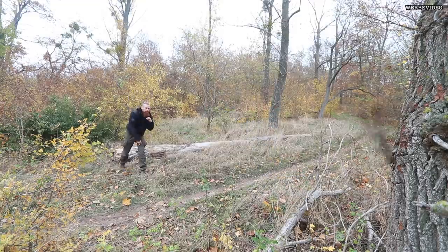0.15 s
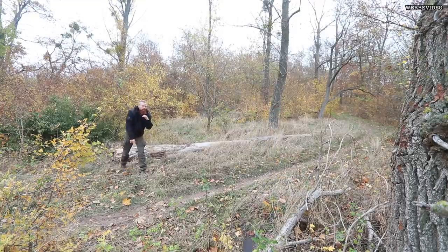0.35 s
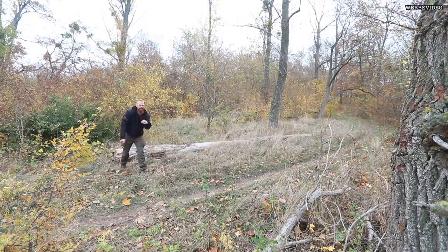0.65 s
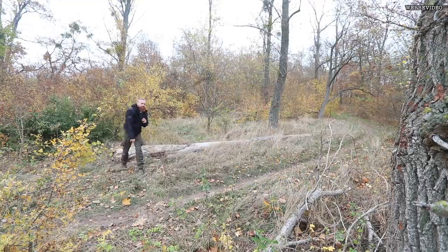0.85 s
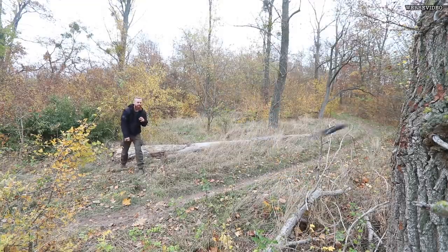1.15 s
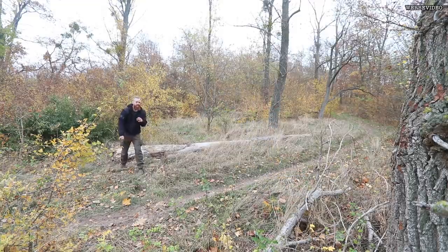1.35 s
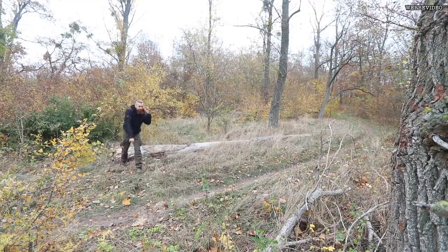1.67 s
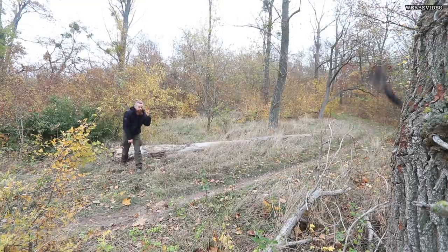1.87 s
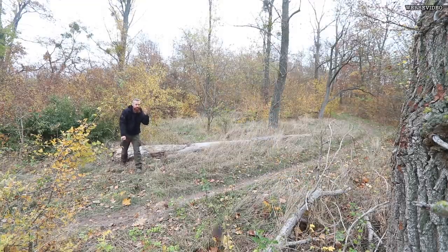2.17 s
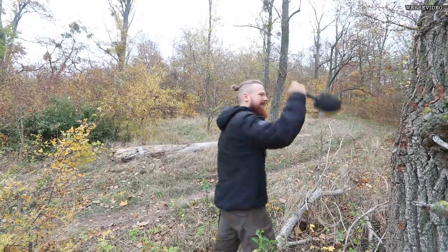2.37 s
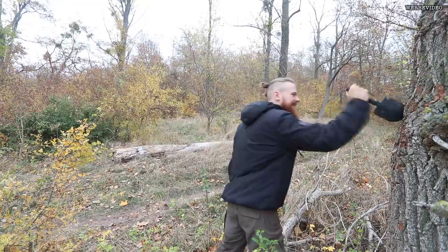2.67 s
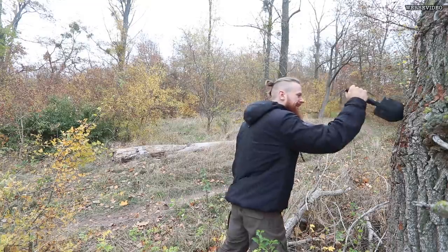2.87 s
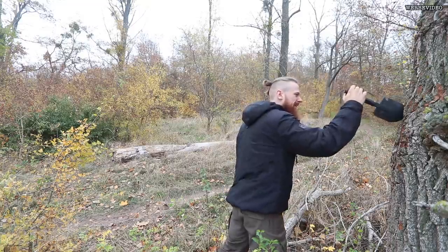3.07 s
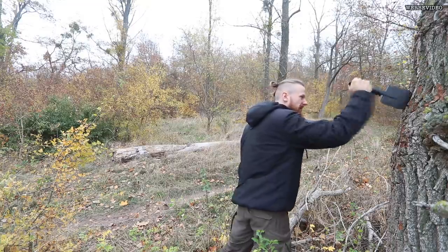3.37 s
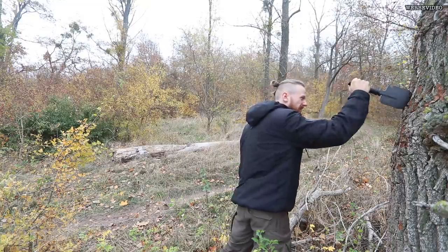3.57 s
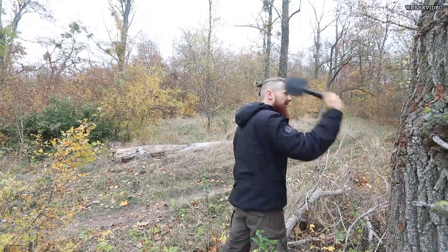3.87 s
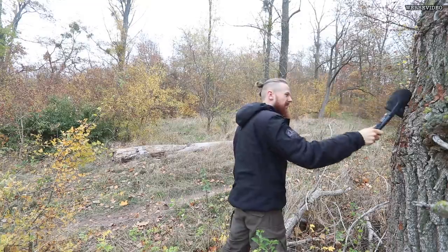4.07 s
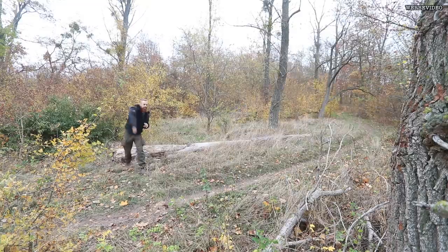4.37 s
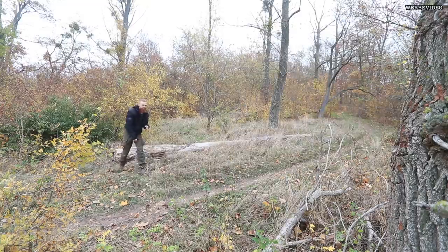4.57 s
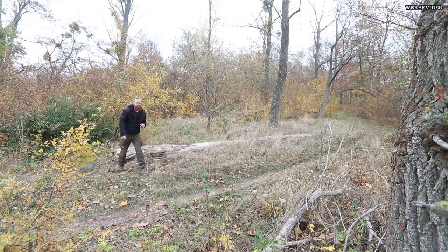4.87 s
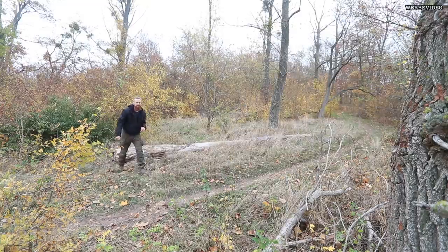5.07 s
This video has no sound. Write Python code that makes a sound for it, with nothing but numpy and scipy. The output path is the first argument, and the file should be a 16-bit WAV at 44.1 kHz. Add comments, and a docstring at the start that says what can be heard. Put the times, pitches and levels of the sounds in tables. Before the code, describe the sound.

A spinning steel shovel swishes in and cracks hard into a nearby tree trunk several times, with hand chops between, in a quiet autumn wood.

```python
"""An autumn wood: a steel folding shovel is thrown and chopped at a tree trunk close to the microphone. In
flight it swishes and whistles (wavering tones and filtered noise); each blow is a shaped noise crack, a damped
low thud and a ring of beating blade modes. Throws chatter at the hinge; the loose shovel then drops into dry
leaves and dead branches, built from noise grains and snaps. Decaying noise echoes answer each blow until its
attempt is cut off; a soft hush lies beneath, and the loudest peaks are flattened."""
import sys
import numpy as np
from scipy import signal
from scipy.fft import rfft, irfft
from scipy.io import wavfile
from scipy.ndimage import uniform_filter1d

SR = 44100
rng = np.random.default_rng(int(sys.argv[2]) if len(sys.argv) > 2 else 0)


def waveform_to_disk(signal):
    """Save audio, clipped to [-1, 1], as 16-bit WAV at the path in sys.argv[1]."""
    frames = np.transpose(np.atleast_2d(signal))
    scaled = np.clip(frames, -1, 1) * 32767
    samples = np.round(scaled).astype(np.int16)
    wavfile.write(sys.argv[1], SR, samples)


N = 230598  # length in samples


def amp(db):
    """Decibels to gain."""
    return 10 ** (np.asarray(db) / 20)


def unit(x):
    """Scales to rms 1."""
    return x / np.sqrt(np.mean(x ** 2) + 1e-20)


def read(points, hz, axis=1):
    """Reads one column of a table along log frequency."""
    table = np.array(points, float)
    return np.interp(np.log(hz + 1), np.log(table[:, 0] + 1), table[:, axis])


def add(mix, start_s, sound):
    """Mixes a sound in at a start time."""
    part = mix[:, max(round(start_s * SR), 0):][:, :sound.shape[-1]]
    part += sound[..., :part.shape[1]]


def bump(hz, centre_hz, octaves):
    """A bell of height 1 around a frequency."""
    return np.exp(-.5 * (np.log2((hz + 1) / centre_hz) / octaves) ** 2)


# left-right likeness of close sounds before any widening: pitch_hz, likeness (0 to 1)
LIKENESS = [(40, 0.32), (150, 0.59), (400, 0.95), (2000, 1), (5000, .92), (14000, 0.84)]


def coloured(white, colour_db, spread=1):
    """Two noises become a left-right pair with a spectrum, at rms 1; spread widens it."""
    hz = np.fft.rfftfreq(white.shape[1], 1 / SR)
    mid, side = rfft(white) * amp(colour_db(hz))
    same = np.clip(read(LIKENESS, hz), 0, 1)
    side = side * spread * np.sqrt((1 - same) / (1 + same))
    return unit(irfft(np.array([mid + side, mid - side]), white.shape[1]))


# spectrum of the distant hush of the wood: pitch_hz, relative level_db (per Hz)
AIR_COLOUR = [(20, -23), (45, -10.5), (80, -4.5), (150, -9), (300, -6.5), (550, -2), (950, -4), (1500, -11),
              (2500, -17), (8000, -22), (16000, -32)]
AIR_DB = -59.5


def hush():
    """Far-off air in the trees: steady, wide filtered noise."""
    white = rng.standard_normal((2, N))
    return amp(AIR_DB) * coloured(white, lambda hz: read(AIR_COLOUR, hz), spread=3.9)


# dry leaves crushed by the falling shovel or stirred by feet: start_s, hold_s, level_db, release_t60_s
RUSTLES = [(0.01, 0.12, -72, .1), (0.537, 0.046, -36.5, 0.23), (0.665, 0.34, -58.5, .25),
           (1.59, 0.22, -61, 0.31), (2.285, 0.016, -54, 0.13), (2.337, .024, -33.5, 0.087),
           (2.407, 0.1, -58, 1), (4.428, 0.18, -58, 0.31), (5.042, .02, -36, 0.55)]
SWELL_SHARE, STIR_DB = 0.26, -75.5  # swell width as a share of the hold; the leaves are never quite still


def rustling():
    """How hard the leaves are stirred: each rustle swells, holds and dies away."""
    clock, power = np.arange(N) / SR, amp(STIR_DB) ** 2
    for start_s, hold_s, level_db, t60_s in RUSTLES:
        before_s = np.minimum(clock - start_s, 0)
        after_s = np.maximum(clock - start_s - hold_s, 0)
        swell = np.exp(-.5 * (before_s / (SWELL_SHARE * hold_s)) ** 2)
        power = power + (swell * amp(level_db - 60 * after_s / t60_s)) ** 2
    return np.sqrt(power)


# spectrum of crackling leaves: pitch_hz, relative level_db (per Hz)
LEAF_COLOUR = [(25, -27.5), (100, -9), (400, -6.5), (1000, 0), (2200, 1.5), (4500, -3.5), (8000, -1),
               (12000, -6.5), (16000, -11.5)]
# twigs snapping: start_s, level_db, pitch_hz
TWIGS = [(0.524, -40, 7000), (0.725, -43.5, 4260), (1.404, -39, 3305), (1.4317, -37.5, 6050),
         (2.331, -36, 4000)]


def litter(grains_per_s=5000, twig_t60_s=0.015):
    """Dry leaves crackle in sparse random grains; now and then a twig snaps in a short noise burst."""
    grains = (rng.random(N) < grains_per_s / SR) * rng.standard_normal((2, N))
    out = rustling() * coloured(grains, lambda hz: read(LEAF_COLOUR, hz), spread=3.7)
    t = np.arange(2 ** 11) / SR
    for start_s, level_db, twig_hz in TWIGS:
        snap = coloured(rng.standard_normal((2, len(t))), lambda hz: 16 * bump(hz, twig_hz, 0.5))
        add(out, start_s, snap * amp(level_db - 60 * t / twig_t60_s))
    return out


def breathy(hz, waver_hz, waver_per_s=120):
    """An unsteady air tone that wavers around a pitch curve."""
    low_pass = signal.butter(2, waver_per_s, fs=SR)
    waver = unit(signal.lfilter(*low_pass, rng.standard_normal(len(hz))))
    return unit(np.sin(2 * np.pi * np.cumsum(hz + waver_hz * waver) / SR))


# spectrum of the blade's swish through air: pitch_hz, relative level_db (per Hz)
SWISH_COLOUR = [(25, -29), (80, -14.5), (200, -3.5), (450, 1.5), (850, -1), (1400, -5), (2000, -8),
                (3500, -12), (8000, -19), (16000, -32)]
# the flight that ends in each throw's hit, levels as if at the microphone:
# last_whistle_s, swish_db (before its pulsing), whistle_db (before a further fade with distance)
FLIGHTS = [(.15, -46, -40), (0.977, -49.5, -53), (1.836, -48.5, -40.5), (4.613, -47, -46.5)]
FLIGHT_S, SPEED_M_PER_S, TRUNK_M = 0.25, 12, 1.8  # longest time in the air, speed, microphone to trunk
TURN_S = .141  # one turn of the shovel
WHISTLE_HZ, EDGE_TONE_HZ, DOPPLER_SHARE = 1890, 900, 0.11  # blade tones; the edge tone sags as it nears


def whirl(spin_db=3, swish_lead_s=0.013, whistle_s=.006, edge_db=-4, edge_swing_db=7, edge_lag_s=.035):
    """The spinning shovel nears: each end swishes in turn, the blade whistles once a turn, its edge sings."""
    out = np.zeros((2, N))
    for (hit_s, *_), (last_whistle_s, swish_db, whistle_db) in zip(THROWS, FLIGHTS):
        left_s = np.arange(min(hit_s, FLIGHT_S), 0, -1 / SR)  # time until the hit
        near = TRUNK_M / (TRUNK_M + SPEED_M_PER_S * left_s)
        turn = 2 * np.pi * (hit_s - left_s - last_whistle_s) / TURN_S

        white = rng.standard_normal((2, 2 ** 15))
        swish = coloured(white, lambda hz: read(SWISH_COLOUR, hz), spread=3)[:, :len(left_s)]
        swish_turn = turn + 2 * np.pi * swish_lead_s / TURN_S
        swish = swish * amp(swish_db + spin_db * np.cos(2 * swish_turn))  # two ends, two swishes a turn

        edge = breathy(EDGE_TONE_HZ * (1 - DOPPLER_SHARE * near), waver_hz=35)
        edge_turn = turn - 2 * np.pi * edge_lag_s / TURN_S
        edge = edge * amp(swish_db + edge_db + edge_swing_db * np.cos(edge_turn))

        edge_on = np.exp((np.cos(turn) - 1) * (TURN_S / (2 * np.pi * whistle_s)) ** 2)
        whistle = amp(whistle_db) * edge_on * breathy(np.full(len(left_s), WHISTLE_HZ), waver_hz=50)
        # the tones fade with distance faster than the swish
        add(out, hit_s - left_s[0], near * (swish + near * (edge + whistle)))
    return out


# the steel blade, each mode a close pair that beats: pitch_hz, level_db (before tilt),
# t60_s (before the contact's share), beat_hz, lift_db (of the crack while pressed on wood)
BLADE = [(795, -23.5, 0.083, 11, 1.5), (1733, -6, 0.18, 19, 4), (2124, -24.5, .08, 56, 4),
         (2310, -19, 0.049, 15, 3), (2906, -23, 0.094, 25, 1), (3531, -21.5, 0.17, 16, -0.5),
         (4000, -21, .12, 14, 2), (4475, -19, 0.11, 34, 3.5), (5020, -23, .07, 38, 3.5),
         (5410, -2, 0.1, 69, 3.5), (6510, -20.5, 0.088, 35, 0), (7080, -19.5, 0.087, 61, 3.5),
         (7674, -10.5, 0.051, 34, 4), (8300, -19, 0.073, 55, 5.5), (9040, -19, .08, 32, 4)]


def pressed_blade(hz, width_hz=55, width_share=0.0028):
    """Pressed against wood, the blade's modes widen into broad resonances (dB)."""
    centre_hz, *_, lift_db = np.transpose(BLADE)[:, :, None]
    width = width_hz + width_share * centre_hz
    return (lift_db * np.exp(-.5 * ((hz - centre_hz) / width) ** 2)).sum(0)


def ring(t, tilt_db, share, twin_db=-2, linger_db=-14, linger_tilt_db=-7, linger=2.8, lag_s=.000012):
    """The blade rings from rest; wide swings lose energy fast in the hinge, small ones linger."""
    hz, level_db, t60_s, beat_hz, _ = np.transpose(BLADE)[:, :, None]
    fall_db = 60 * t / (t60_s * share)
    lingering = amp(linger_db + linger_tilt_db * np.log2(hz / hz[1]) - fall_db / linger)
    fade = amp(level_db + tilt_db * np.log2(hz / 4500)) * (amp(-fall_db) + lingering)
    twin = 1 + amp(twin_db) * np.exp(2j * np.pi * beat_hz * t)
    pair = np.exp(2j * np.pi * (hz - beat_hz / 2) * t) * twin
    # left and right hear it slightly out of step
    ports = np.exp(2j * np.pi * hz.T * np.array([[-lag_s], [lag_s]]))
    return (ports @ (fade * pair)).imag * (1 - np.exp(-t / .001))


def causal(log_gain):
    """The spectrum of the quickest response that has this gain (minimum phase)."""
    circle = np.concatenate([log_gain, log_gain[-2:0:-1]])
    return np.exp(np.conj(signal.hilbert(circle)))[:len(log_gain)]


# spectrum of splitting bark and scraping steel: pitch_hz, relative level_db (per Hz)
CRACK_COLOUR = [(25, -34), (70, -13), (150, -14), (280, -3.5), (800, -2), (1500, -2.5), (3400, -9),
                (5500, -10), (8500, -13.5), (11000, -19), (16000, -25)]


def crack(t, t60_s, tilt_db, knock_hz, knock_db, knock_octaves=0.14, rise_s=0.00015, grain_db=2,
          smooth_bins=80):
    """Bark gives way in a burst of tiny fractures, coloured by the blade and a dead knock of the shaft."""
    hz = np.fft.rfftfreq(len(t), 1 / SR)
    clumps = unit(uniform_filter1d(rng.standard_normal(len(t)), size=24))  # fibres snap in bunches
    fractures = rng.standard_normal((2, len(t))) * amp(grain_db * clumps)
    envelope = amp(-60 * t / t60_s) * (1 - np.exp(-t / rise_s))
    burst = rfft(coloured(fractures, np.zeros_like) * envelope)
    # the burst drives all bands evenly, so that wood and steel set the colour
    drive = np.sqrt(uniform_filter1d((abs(burst) ** 2).mean(0), smooth_bins) + 1e-12)
    colour_db = read(CRACK_COLOUR, hz) + pressed_blade(hz)
    colour_db += tilt_db * np.log2((hz + 200) / 1500)
    colour_db += knock_db * bump(hz, knock_hz, knock_octaves)
    shaped = irfft(burst * causal(np.log(amp(colour_db) / drive)))
    return unit(shaped) * np.sqrt(np.mean(envelope ** 2))


def thud(t, hz, t60_s=.034, upper_db=-9, upper_ratio=1.6, upper_t60_s=0.04, lowest_hz=130):
    """Two damped modes of the shovel pressed against wood; so small a body radiates no deep bass."""
    lower = np.sin(2 * np.pi * hz * t) * amp(-60 * t / t60_s)
    upper = np.sin(2 * np.pi * hz * upper_ratio * t) * amp(upper_db - 60 * t / upper_t60_s)
    low_cut = signal.butter(2, lowest_hz, "high", fs=SR)
    return signal.lfilter(*low_cut, (lower - upper) * (1 - np.exp(-t / 0.00089)))


# the thrown shovel hits the trunk: start_s, crack_db, knock_hz, thud_db, thud_hz, chatter_db (first slap),
# step_db (per slap), chatter_tilt_db (per octave), ring_db (free ring), ring_tilt_db (per octave),
# ring_share (of the blade's t60), hum_db (shaft), echo_db (send of the hit)
THROWS = [ (0.203, 6, 1273, 2, 399.5, 2.5, -2, 6.5, -9, 2, 1.2, -54, -1.5),
          (1.061, 8, 1100, 6.5, 489.3, -1, -1.5, 3, -36, 12.5, 0.53, -61, 2),
          (1.911, 9, 1050, 6, 614.8, -4, -3.5, 7, -17, 9, 1.1, -50.5, -2),
          (4.6743, 6, 1260, 4.5, 663.4, -5, -4, -0.5, -29, 3, 0.65, -54, -2), ]
CHATTER_GAP_S, CHATTER_T60_S, CHATTER_HZ = .0058, .036, 1950  # the hinge slaps to and fro after a throw
SHAFT_HZ = 117  # the lowest bending mode of the shaft


def throws(t, t60_s=.03, tilt_db=-1.15, knock_db=3.5, held_ring_db=-28, held_tilt_db=5, held_share=0.32,
           slap_ring_db=-18, slap_thud_db=-6, slap_ratio=.68, pan_db=-2.0, count=3):
    """The blade cracks into the trunk and chatters at its hinge; once off the bark it rings and hums."""
    for (start_s, crack_db, knock_hz, thud_db, thud_hz, chatter_db, step_db, chatter_tilt_db,
         ring_db, ring_tilt_db, ring_share, hum_db, echo_db) in THROWS:
        held = ring(t, held_tilt_db, held_share)
        hit = amp(crack_db) * crack(t, t60_s, tilt_db, knock_hz, knock_db) + amp(held_ring_db) * held
        yield start_s, hit, amp(thud_db) * thud(t, thud_hz), echo_db, pan_db

        for k in range(count):
            strength = amp(chatter_db + k * step_db)
            slap = crack(t, CHATTER_T60_S, chatter_tilt_db, CHATTER_HZ, knock_db)
            slap = slap + amp(slap_ring_db) * held
            slap_hz = thud_hz * slap_ratio * rng.uniform(.7, 1.3)
            low = amp(thud_db + slap_thud_db) * thud(t, slap_hz, t60_s=0.027)
            slap_s = start_s + (k + 1) * CHATTER_GAP_S
            yield slap_s, strength * slap, strength * low, echo_db - 2.5, pan_db

        free = amp(ring_db) * ring(t, ring_tilt_db, ring_share)
        hum = amp(hum_db) * np.sin(2 * np.pi * SHAFT_HZ * t) * (1 - t / t[-1])
        yield start_s + count * CHATTER_GAP_S, free, hum, echo_db - 5, pan_db


# the shovel rebounds on bark, ground or dead branches: start_s, crack_db, crack_t60_s,
# tilt_db (per octave), knock_hz, thud_db, thud_hz, ring_db, echo_db (send)
BOUNCES = [ (0.557, -23.5, 0.071, 0, 2337, -34, 325, -32.5, -11),
           (0.5814, -18, 0.034, 3, 6300, -32.5, 302, -27, 1),
           (1.953, -11, 0.057, 3, 2900, -1.5, 270, -33.5, -3.5),
           (2.339, -30, 0.079, 2, 787, -22, 262, -46.5, -10),
           (2.3542, -14, 0.019, 0, 2660, -22.5, 192, -41, -11.5),
           (2.781, -33.5, .05, -8, 2430, -29, 310, -61.5, -6.5),
           (5.0192, 6.5, 0.018, 1, 2230, -18, 449, -24, -2.5),
           (5.0403, -6.5, 0.039, -0.5, 995, -14, 843, -40, -11),
           (5.0765, -21, 0.032, 2, 895, -27, 290, -54, 1),
           (5.1405, -22, 0.034, 2.2, 1990, -27, 323, -41, -9), ]


def bounces(t, knock_db=6.0, ring_tilt_db=-1, ring_share=0.65, pan_db=1.0):
    """The loose shovel lands in single knocks, each a crack, a short ring and a thud."""
    for start_s, crack_db, t60_s, tilt_db, knock_hz, thud_db, thud_hz, ring_db, echo_db in BOUNCES:
        knock = amp(crack_db) * crack(t, t60_s, tilt_db, knock_hz, knock_db)
        bright = knock + amp(ring_db) * ring(t, ring_tilt_db, ring_share)
        yield start_s, bright, amp(thud_db) * thud(t, thud_hz), echo_db, pan_db


def swings(swish_db=-52, length_s=0.012):
    """The blade swishes briefly on its way into each chop: a bell-shaped puff of noise."""
    out, t = np.zeros((2, N)), np.arange(2 ** 13) / SR
    puff = np.exp(-.5 * ((t - t.mean()) / length_s) ** 2)
    for start_s, *_ in CHOPS:
        white = rng.standard_normal((2, len(t)))
        swish = coloured(white, lambda hz: read(SWISH_COLOUR, hz), spread=3.6)
        add(out, start_s - t.mean(), amp(swish_db) * swish * puff)
    return out


# chops by hand: start_s, crack_db, knock_hz, touch_db (first thud), bite_delay_s, bite_db, bite_hz,
# thud_db, thud_hz, ring_db, ring_tilt_db (per octave), echo_db (send)
CHOPS = [ (2.7343, -7.5, 1246, -10, 0.0079, -10, 7200, -5, 320, -40.5, 4, -2.5),
         (3.4338, -6, 2000, -15, 0.001394, -3, 2670, -16, 418, -34.5, 4, -2),
         (4.0593, -2.5, 1283, -1, .0026, 1, 957, 2, 381.5, -23, -4.5, -2.5), ]


def chops(t, touch_t60_s=0.023, bite_t60_s=0.018, touch_tilt_db=-3, bite_tilt_db=0, touch_knock_db=5,
          bite_knock_db=8, touch_ratio=0.723, thud_t60_s=0.041, ring_share=0.37, pan_db=-3.0):
    """A chop touches the bark with a lower thud, then bites into the wood."""
    for (start_s, crack_db, knock_hz, touch_db, delay_s, bite_db, bite_hz, thud_db, thud_hz,
         ring_db, ring_tilt_db, echo_db) in CHOPS:
        touch = amp(crack_db) * crack(t, touch_t60_s, touch_tilt_db, knock_hz, touch_knock_db)
        touch_thud = amp(touch_db) * thud(t, thud_hz * touch_ratio)
        yield start_s, touch, touch_thud, echo_db, pan_db

        bite = amp(bite_db) * crack(t, bite_t60_s, bite_tilt_db, bite_hz, bite_knock_db)
        bite = bite + amp(ring_db) * ring(t, ring_tilt_db, ring_share)
        yield start_s + delay_s, bite, amp(thud_db) * thud(t, thud_hz, thud_t60_s), echo_db, pan_db


def echo(bands, build_s, same):
    """Countless small reflections that build up, then die at a speed set by frequency."""
    mid, side = rng.standard_normal((2, 65536))
    same = np.clip(same, 0, 1)
    common, apart = mid * np.sqrt(1 + same), side * np.sqrt(1 - same)
    white = np.array([common - apart, common + apart]) / np.sqrt(2)
    hz, t, z = signal.stft(white, SR, nperseg=512)
    t60_s = read(bands, hz, axis=2)[:, None]
    even_energy = np.sqrt(2 * np.log(1000) / (t60_s * SR))  # long tails start softer
    z *= amp(read(bands, hz)[:, None] - 60 * t / t60_s) * even_energy
    tail = signal.istft(z, SR)[1]
    return tail * (1 - np.exp(-np.arange(tail.shape[1]) / SR / build_s))


# echo of ground and undergrowth: pitch_hz, level_db (of the whole tail), t60_s
THICKET = [(100, -20, 0.74), (400, -16.5, 0.17), (1460, -19, 0.1), (4940, -17, 0.24), (9000, -15, .17),
           (16000, -19.5, .14)]
# echo of the trees: pitch_hz, level_db (of the whole tail, before each contact's send), t60_s
FOREST = [(50.14, -29, .9), (90, -23, 1.8), (120, -22, .9), (170, -31, .9), (460, -25, 3.5),
          (1000, -25.5, 0.74), (2284, -28.5, 1.4), (4000, -26.5, 0.75), (8000, -22, 0.51),
          (15000, -27, 0.42)]
# where one attempt is cut to the next: time_s
CUTS = [0, 1.447, 2.39, 4.385, 6]


def shovel(thud_echo_db=-6):
    """Contacts crack, thud and ring into two echoes; each attempt fades over 10 ms up to its cut."""
    t, clock, out = np.arange(2 ** 14) / SR, np.arange(N) / SR, np.zeros((2, N))
    contacts = [*throws(t), *bounces(t), *chops(t)]
    for begin_s, end_s in zip(CUTS, CUTS[1:]):
        direct, sent = np.zeros((2, 2, N))
        for start_s, bright, low, echo_db, pan_db in contacts:
            if begin_s <= start_s < end_s:
                add(direct, start_s, (bright + low) * amp([[pan_db / 2], [-pan_db / 2]]))
                # the soft ground swallows much of the thud
                add(sent, start_s, amp(echo_db) * (bright + amp(thud_echo_db) * low))
        thicket = echo(THICKET, build_s=.006, same=.7)
        forest = echo(FOREST, build_s=0.011, same=0.61)
        near = signal.fftconvolve(direct.mean(0)[None], thicket, axes=1)[:, :N]
        far = signal.fftconvolve(sent.mean(0)[None], forest, axes=1)[:, :N]
        out += (direct + near + far) * np.clip((end_s - clock) / 0.01, 0, 1)
    return out


def scene():
    """The quiet wood, leaf litter, flight, swings and blows."""
    return hush() + litter() + whirl() + swings() + shovel()


EDGE_HZ = 16200  # upper band limit


def record(dry, ceiling=0.96):
    """The loudest peaks are flattened with a hard knee; then a gentle low cut and the band limit."""
    clipped = dry / (1 + (dry / ceiling) ** 20) ** (1 / 20)
    clipped = signal.lfilter(*signal.butter(1, 45, "high", fs=SR), clipped)
    band_limit = signal.firwin(255, EDGE_HZ, window=("kaiser", 8), fs=SR)
    return signal.oaconvolve(clipped, band_limit[None], "same")


dry = scene()
out = record(dry)
waveform_to_disk(out)
```